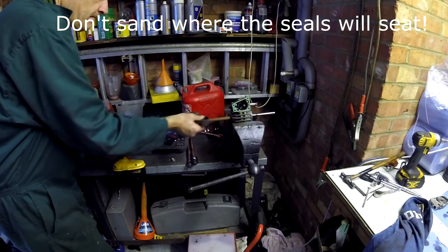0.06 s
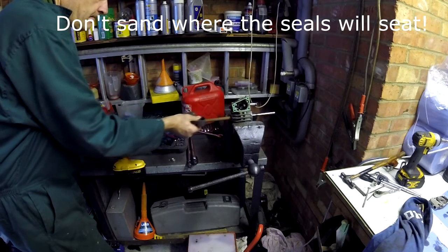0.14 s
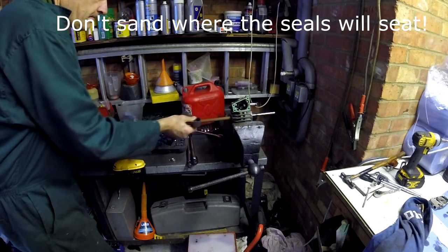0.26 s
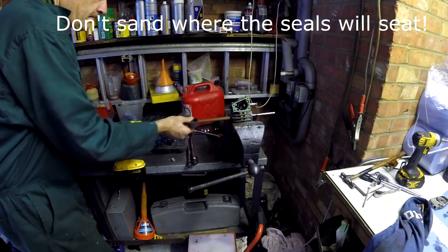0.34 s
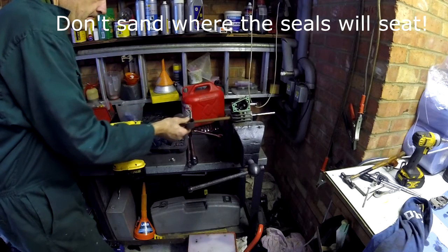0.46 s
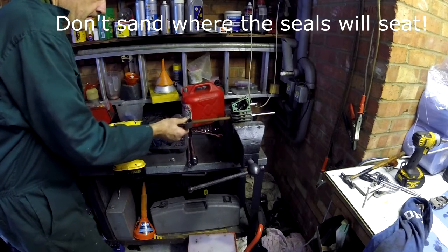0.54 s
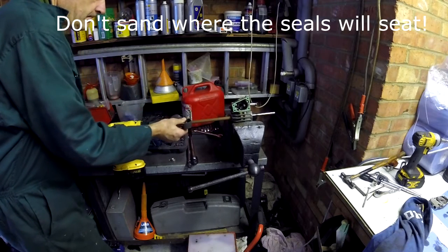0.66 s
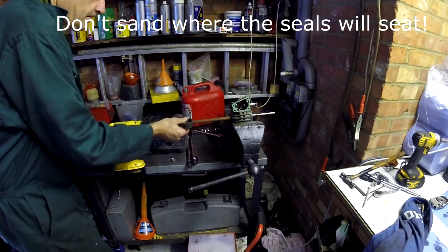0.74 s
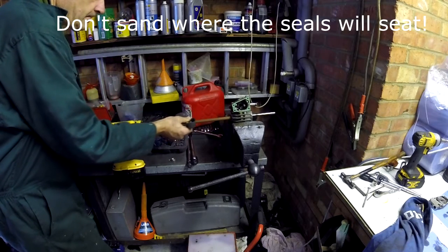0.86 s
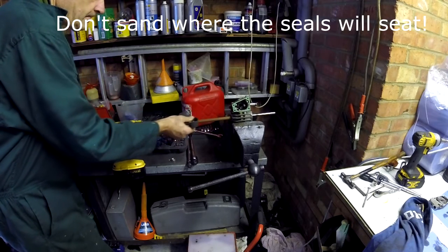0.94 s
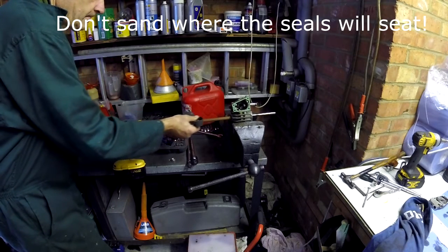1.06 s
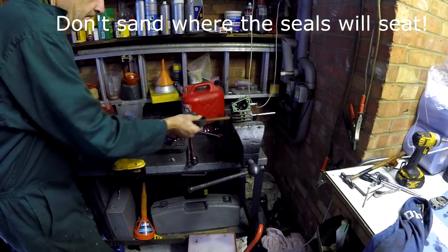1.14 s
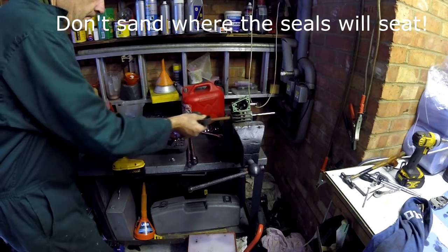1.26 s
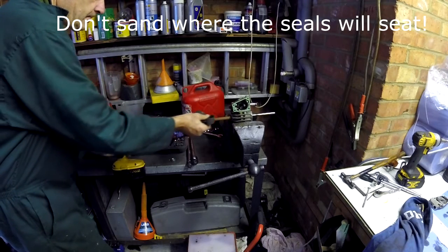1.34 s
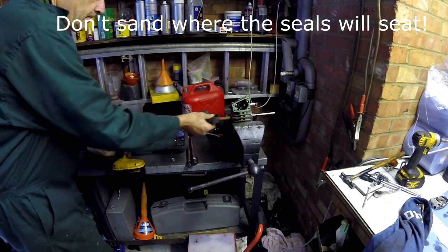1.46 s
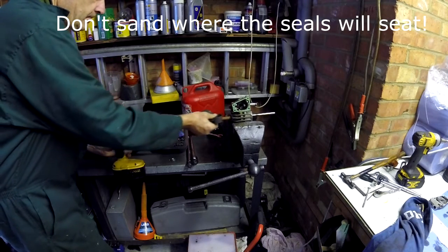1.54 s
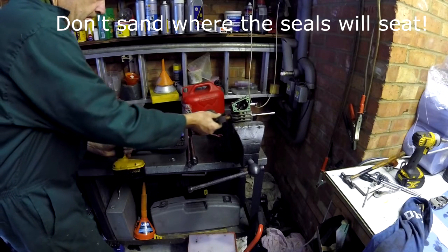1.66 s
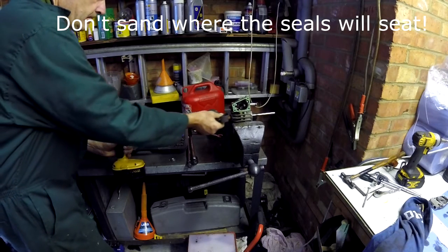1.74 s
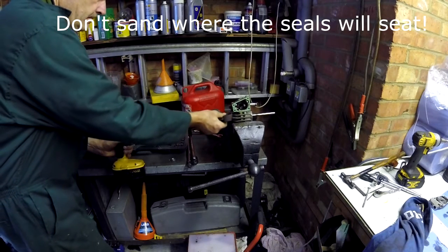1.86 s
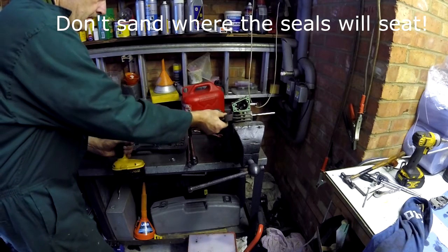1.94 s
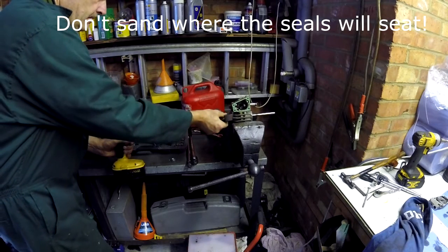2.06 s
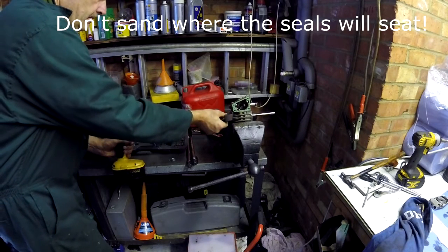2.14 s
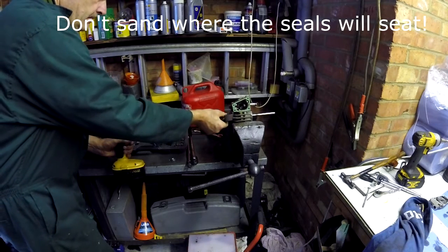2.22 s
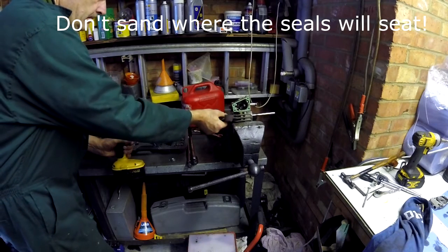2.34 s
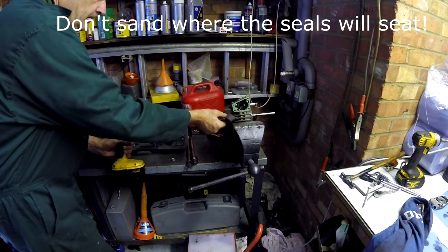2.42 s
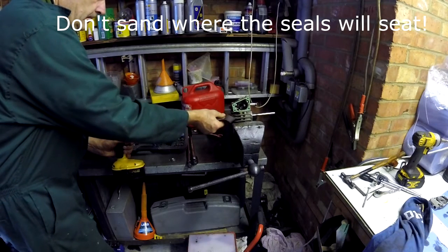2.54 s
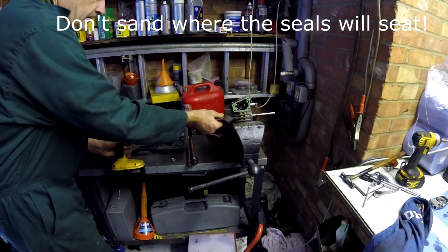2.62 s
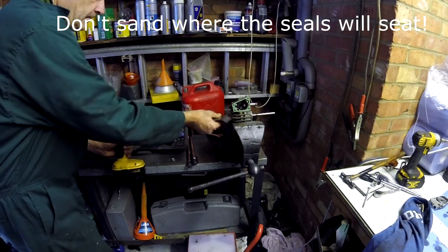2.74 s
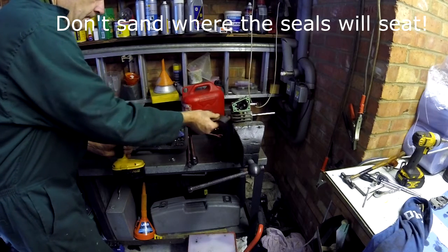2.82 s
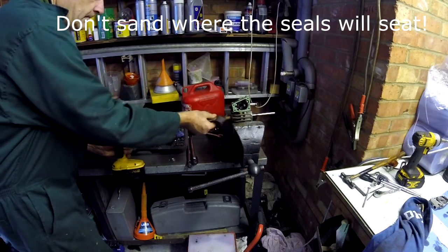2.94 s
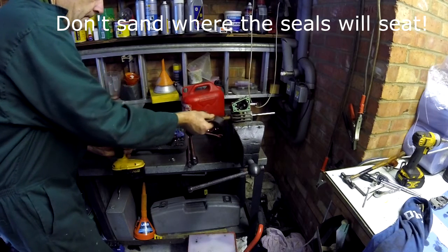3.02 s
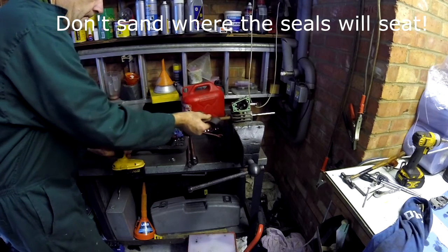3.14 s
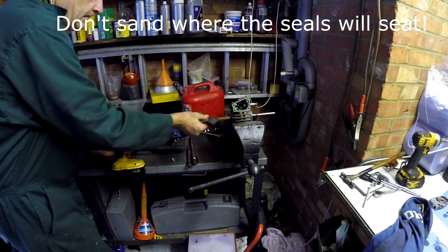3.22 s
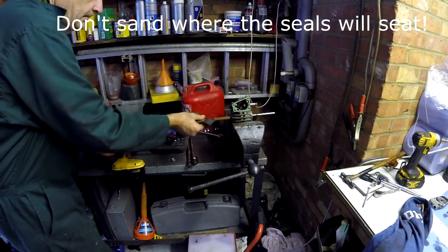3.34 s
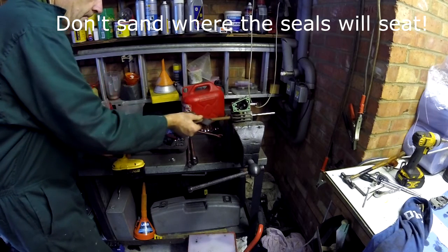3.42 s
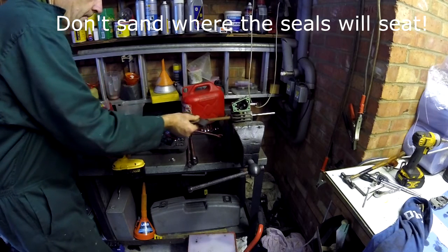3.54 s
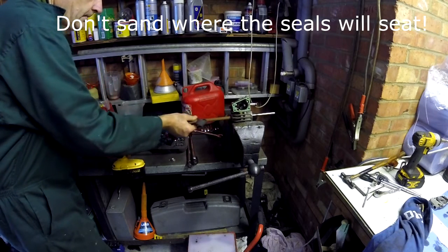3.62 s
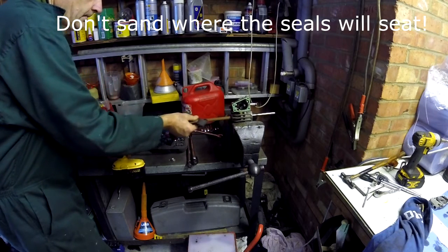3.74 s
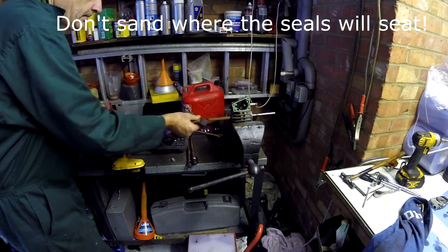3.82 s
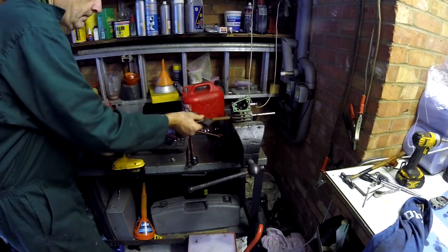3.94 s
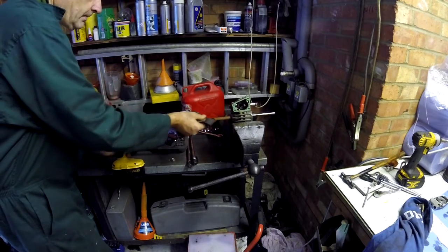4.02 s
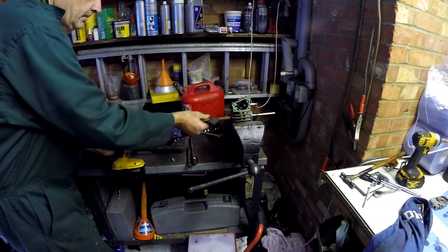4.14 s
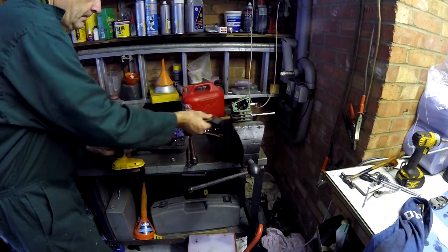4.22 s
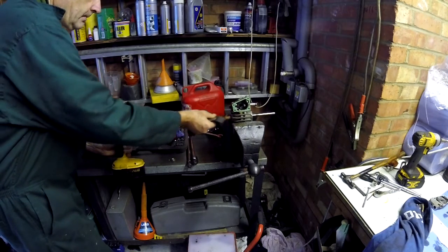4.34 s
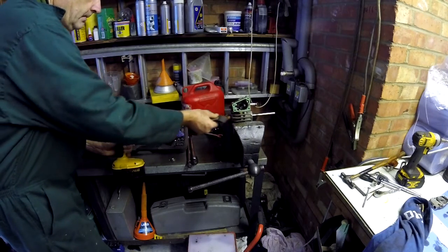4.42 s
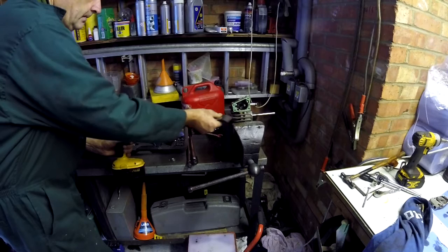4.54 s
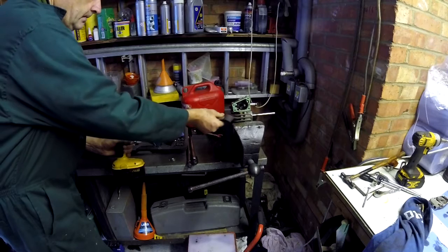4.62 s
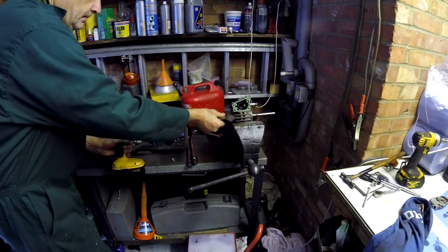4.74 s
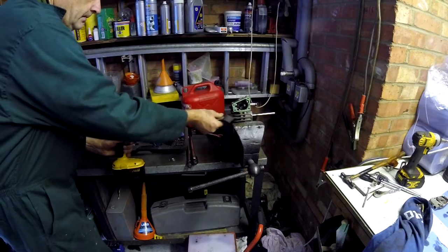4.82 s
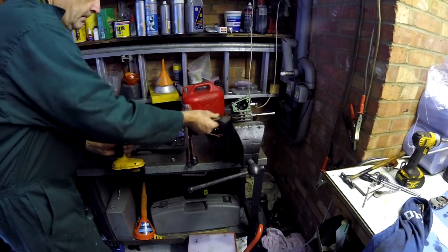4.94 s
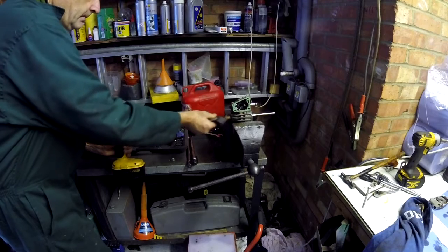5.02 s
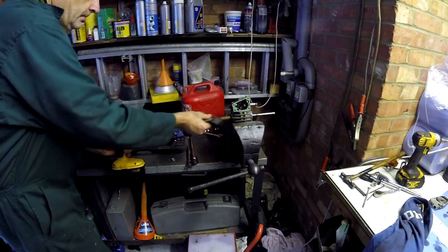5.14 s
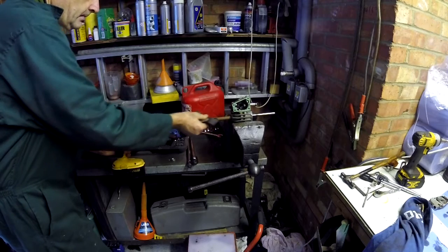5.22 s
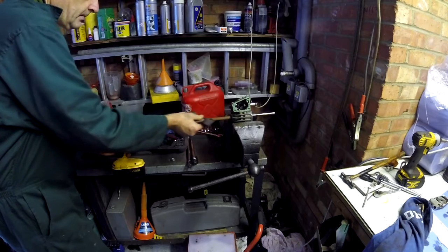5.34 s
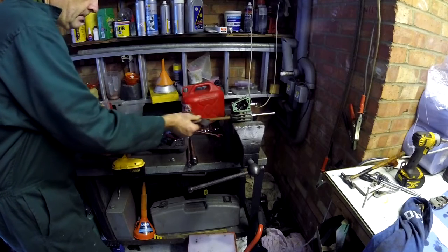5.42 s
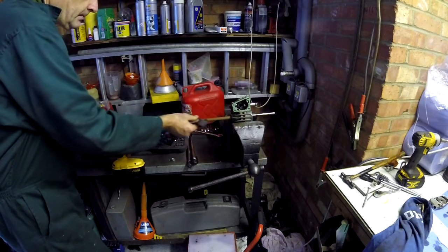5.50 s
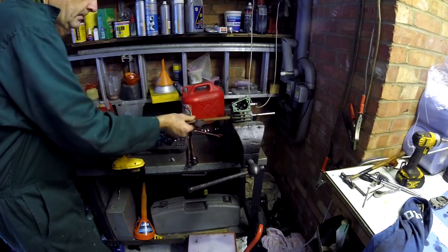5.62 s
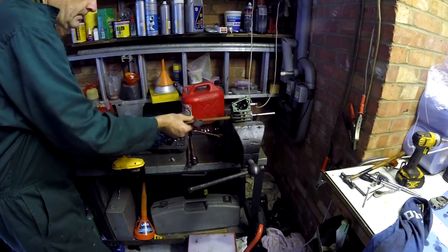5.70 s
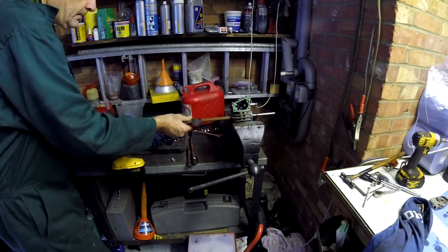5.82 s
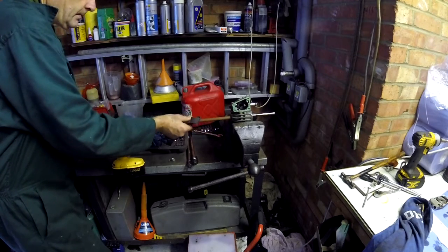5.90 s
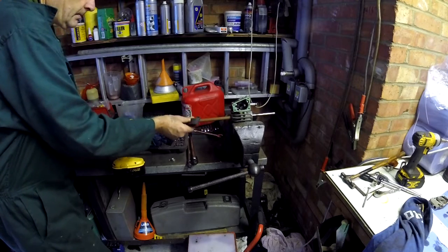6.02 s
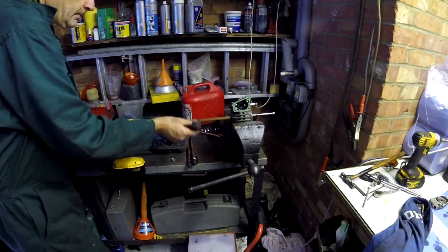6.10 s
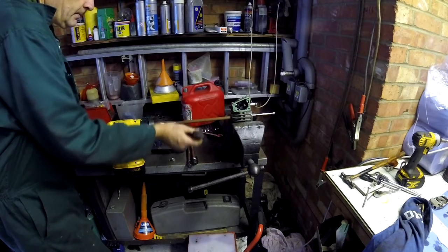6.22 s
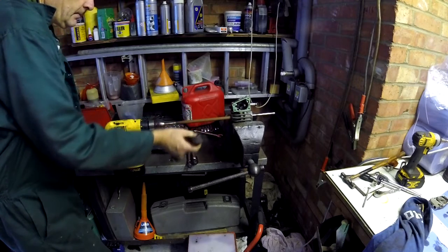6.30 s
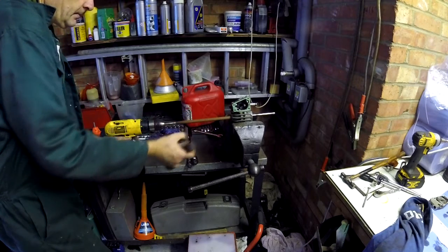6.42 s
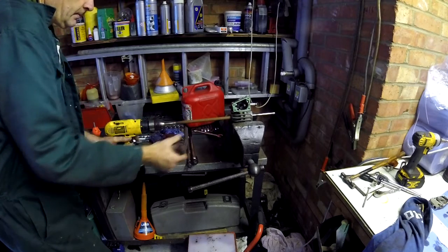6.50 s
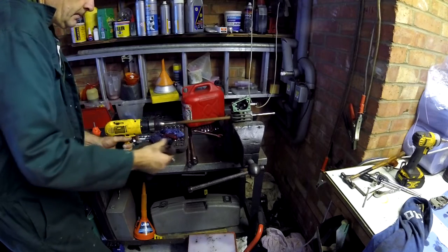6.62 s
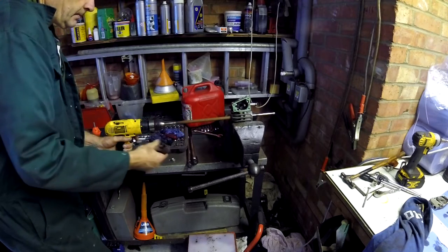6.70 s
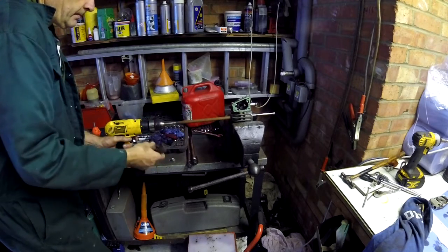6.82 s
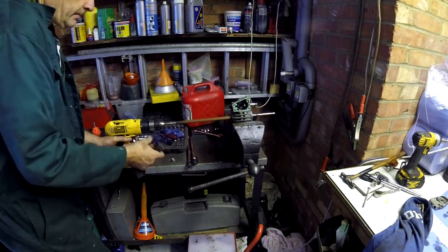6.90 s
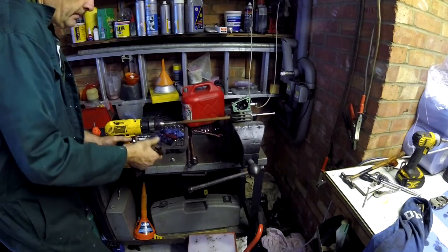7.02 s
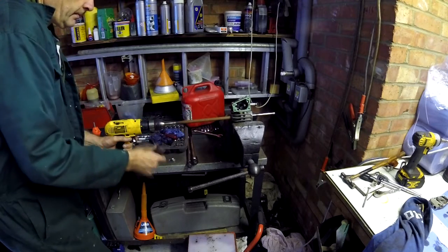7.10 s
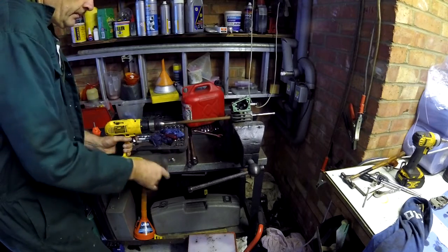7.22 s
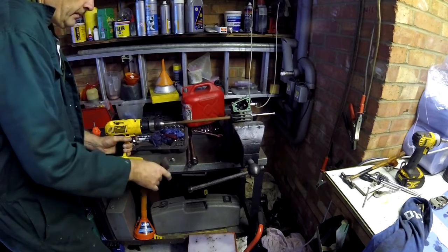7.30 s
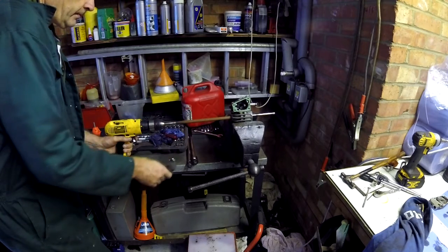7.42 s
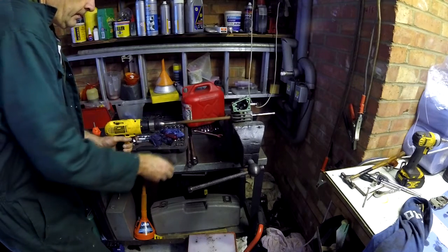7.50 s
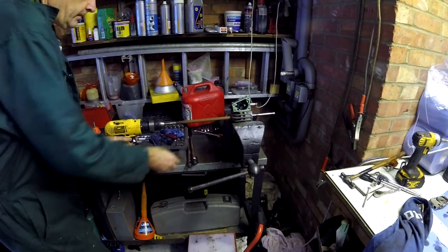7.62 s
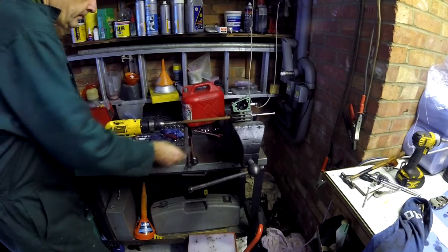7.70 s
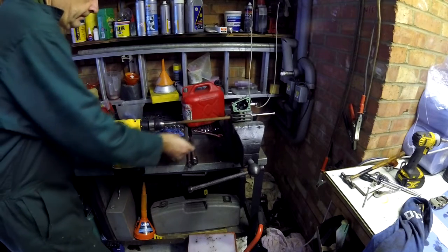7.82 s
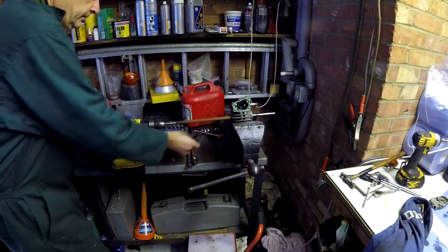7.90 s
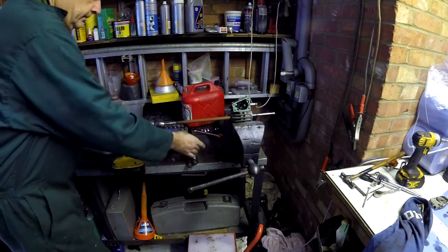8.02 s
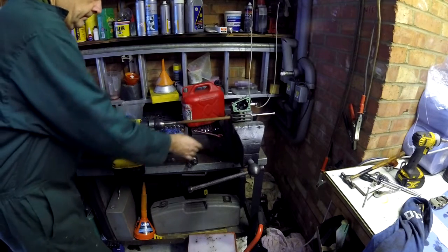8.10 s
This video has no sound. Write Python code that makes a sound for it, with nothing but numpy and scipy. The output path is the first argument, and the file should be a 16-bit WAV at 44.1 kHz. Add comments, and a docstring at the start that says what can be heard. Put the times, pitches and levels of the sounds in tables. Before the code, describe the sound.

A cordless drill spins a rusty steel shaft while sandpaper is pressed against it: a loud, continuous bright gritty hiss with metallic ringing, over a thin gear whine that dips lower under load. Just after six seconds the drill brakes to a sudden halt. In the quiet, stiff paper ticks, snaps and rustles in the hand. Small close-walled workshop, mono camera microphone, thin bass and a sharp treble edge.

```python
"""Drill and sandpaper, small workshop

A cordless drill spins a rusty steel shaft while a hand presses sandpaper on it, close walls around.
Coloured noise is the grit's hiss, filtered noise the ringing shaft; sines on one wavering speed are the gears.
The drill stops and the stiff paper crackles in the hand: ticks, noise bursts and a body resonance.
Behind lie quiet air and low hums. A mono camera microphone cuts the bass and has a sharp treble resonance.
"""
import sys
import numpy as np
from scipy import signal
from scipy.fft import rfft, irfft, next_fast_len
from scipy.io import wavfile
from scipy.ndimage import uniform_filter1d

SR = 44100
rng = np.random.default_rng(int(sys.argv[2]) if len(sys.argv) > 2 else 0)


def wrap_up_sound(samples):
    """Save the sound to the file named by the first command line argument, as 16-bit audio."""
    columns = np.atleast_2d(samples).T
    # keep every value between -1 and 1, then stretch to whole-number steps
    tamed = np.clip(columns, -1, 1)
    steps = np.round(tamed * 32767).astype(np.int16)
    wavfile.write(sys.argv[1], SR, steps)


N = 359402

# workshop air, spectrum: f/Hz, level/dB
AIR_SPECTRUM = [(30, 0), (130, 1.5), (200, -0.5), (350, -7), (700, -12.5), (1500, -16.5), (3000, -27),
                (4200, -49), (5400, -54), (7000, -24), (10000, -25.5), (12000, -33), (15500, -30)]
# low hums whose pitch wavers: f/Hz, rms wander/Hz, level/dB
HUMS = [(146.8, 1.2, -57.5), (166, 2.96, -66)]
AIR_DB = -55.5

# rustle of the handled paper: t/s, level/dB
RUSTLE_LEVEL = [(6.1, -49), (6.18, -66), (6.47, -63), (6.6, -59), (6.72, -64.5), (6.93, -66), (7.06, -60),
                (7.15, -64.5), (7.23, -61.5), (7.3, -66), (7.38, -72), (7.45, -56), (7.53, -69.5),
                (7.9, -71), (8.05, -61), (8.13, -68)]
# snaps of the paper: t/s, level/dB, first tick/dB re snap, burst t60/s, body/dB re snap, body f/Hz,
# bright edge/dB re crackle
PAPER_SNAPS = [(6.2223, -41, 1, .08, -19, 2260, -20), (6.2357, -38, -4, .1, -24, 2060, -19),
               (6.2564, -41, -2, .1, -11, 1650, -16), (6.349, -26, -4, 0.072, -12.5, 1690, -7),
               (6.3694, -31.5, 1, .077, -7, 1670, -17), (6.3844, -41, 2, .08, -18, 2410, -16),
               (6.3984, -39, -2, .08, -11, 2160, -18), (6.5874, -25, -10, .082, -5.5, 2180, -2),
               (6.6094, -41, -2, .16, -11, 2130, -16), (6.781, -38, -2, .1, -6, 1620, -2),
               (6.7945, -19.5, -7, 0.08, -12, 1830, -11), (6.8138, -23.5, 0, .077, -7, 1950, -19),
               (6.8824, -37.5, -9, .1, -9, 1830, -19), (6.9556, -37, -2, .093, -16, 2370, -18),
               (6.972, -29.5, 5, 0.057, -29, 2320, -30), (7.002, -31, -4, 0.16, -16, 1510, -26),
               (7.0344, -36, 0, 0.1, -18, 1850, -21), (7.1387, -44, -3, 0.064, 4, 2090, -16),
               (7.3102, -30, -8, .1, -12, 2030, -25), (7.3731, -41, -2, .1, -5, 1640, -16),
               (7.9189, -36, -8, .061, -5, 1980, -21), (7.958, -40, -1, .1, -10, 1930, -21),
               (7.9714, -40, -2, 0.064, 0, 1890, -20), (8.0165, -29, -4, .12, -14, 1680, -15),
               (8.0332, -21, -3, 0.065, -11, 1500, -20)]
# rubs of the sheet against the fingers: t/s, length/s, f/Hz, resonator width/Hz, level/dB
SHEET_RUBS = [(7.39, .14, 1650, 120, -55), (7.41, 0.12, 2100, 330, -61), (7.42, 0.082, 3100, 300, -63),
              (7.12, .08, 2080, 89, -61), (7.865, .035, 5900, 80, -78)]
# dull knocks of the hand on the shaft: t/s, level/dB
HAND_KNOCKS = [(7.002, -55), (8.0165, -52), (8.033, -41.5)]
# resonances of the sheet: f/Hz, nominal width/Hz, level/dB
SHEET_MODES = [(1680, 760, 1), (2030, 540, 8), (2470, 540, -1), (3200, 740, -3)]
# spectra of the crackle, its bright edge, the first tick of a snap and the knock: f/Hz, level/dB
CRISP_SPECTRUM = [(2500, -27), (3300, 2.5), (4200, -3.5), (6000, -1.5), (7500, -4), (10000, -3),
                  (11500, -20), (15500, -26)]
BRIGHT_SPECTRUM = [(6000, -38), (7200, 1), (9500, 6), (11000, -15.5), (15500, -24)]
TICK_SPECTRUM = [(1200, -14), (2500, 1), (6000, 0), (9000, -1), (11000, -12), (15500, -28)]
THUD_SPECTRUM = [(250, -8), (400, -3), (1100, -1), (1500, -12)]
SHEET_DB = -0.5  # body of the sheet re its rustle
KNOCK_T60_S = 0.09
SMALL_PER_S, SMALL_DB = 23, 16  # tiny scattered ticks: mean rate, level re the rustle

# gears, whose speed sags in steps under load: t/s, mesh f/Hz, mesh level/dB
GEAR_MESH = [(0, 1172, -44), (.5, 1182, -48.5), (1.1, 1175, -43), (2.0, 1173, -40.5), (2.27, 1167, -40.5),
             (2.33, 1140, -52), (2.36, 1058, -51), (3.32, 1041, -50), (3.39, 1040, -60), (3.43, 973, -47),
             (3.62, 962, -45.5), (3.8, 974, -54), (3.88, 990, -61), (3.93, 1163, -43), (4.2, 1162, -39.5),
             (4.75, 1168, -41), (5.1, 1158, -46), (5.5, 1156, -41), (5.76, 1163, -46), (5.9, 1188, -43),
             (6.04, 1112, -54), (6.09, 1020, -76)]
SLOWER_STAGE, FASTER_STAGE = 0.655, 2.523  # multiples of the mesh frequency
SLOWER_DB, FASTER_DB = -49, -2.5  # slower stage; faster tone re the mesh
FREE_HZ, SAG_DB_PER_HZ = 1150, 3  # the upper tones fade when the mesh sags under FREE_HZ
THIRD_DB, THIRD_FADE_DB_PER_S = -1, -3  # third harmonic re the mesh, and its fade with time

# sanding: t/s, hiss level/dB, then middle, upper and high rings/dB re the hiss
SANDING_LEVELS = [(0, -22.5, -8, -10, -10), (.34, -21, -9.5, -10.5, -10.5), (.53, -23, -6, -10, -12.5),
                  (.85, -22, -7.5, -9, -9), (1.4, -22.3, -9, -8.5, -8.5), (1.9, -23.5, -12, -11, -11),
                  (2.15, -22.5, -13.5, -12.5, -13), (2.38, -22, -11.5, -10, -11.5),
                  (3.0, -22, -9, -10.5, -11), (3.7, -24, -8, -8.5, -10), (4.0, -22.5, -10, -11, -10),
                  (4.6, -24, -8.5, -11, -11), (5.1, -23, -9.5, -11, -11), (5.73, -22, -9, -11, -10.5),
                  (5.83, -27.5, -11, -10, -15), (6.04, -29, -10, -12.5, -16), (6.09, -45, -12, -20, -16),
                  (6.14, -57, -10, -12, -11)]
# spectra of the scratching grit and of its fine treble dust: f/Hz, level/dB
GRIT_SPECTRUM = [(100, -27), (400, -7.5), (1000, -4), (2000, -1.5), (3500, -3), (5500, -1.5), (7000, 1),
                 (9500, -0.5), (11000, -11.5)]
DUST_SPECTRUM = [(9000, 3), (11000, -4), (12500, 6.5), (15500, -2)]
# shaft and bench modes damped by the hand, from low to high: f/Hz, nominal width/Hz, level/dB
DEEP_MODES = [(172, 56, -6), (567, 55, -4.5), (280, 39, -9.5), (410, 26, -10), (473, 29, -2.5),
              (709, 16, -2.5), (808, 72, -4), (980, 68, -1.5), (1075, 56, -3)]
LOW_MODES = [(1285, 104, 0.5), (1290, 61, -8), (1447, 100, -1)]
MIDDLE_MODES = [(1539, 61, -2), (1670, 79, -5.5), (1796, 91, 2), (1966, 47, -1), (2065, 44, -1.5),
                (2183, 56, -5.5)]
UPPER_MODES = [(2264, 56, -2.5), (2360, 62, -5), (2528, 64, -1.7), (2655, 78, -1.7), (2803, 54, -2.1)]
HIGH_MODES = [(2944, 134, 2), (3094, 48, -7.5), (3265, 100, -3), (3360, 140, -9), (3560, 52, -4.5),
              (3830, 170, -3.5)]
# spells in which one mode sings out under the moving hand:
# t/s, length/s, f/Hz, resonator width/Hz, level/dB
SINGING_SPELLS = [(.3, 0.4, 1957, 71, -36.5), (.4, 0.32, 2045, 30, -38), (.3, 0.85, 1637, 31, -37.5),
                  (.3, 0.59, 1760, 42, -41), (.3, 0.39, 2750, 70, -39), (1.5, 0.44, 3270, 30, -47),
                  (2.0, 1.137, 3256, 28, -43.5), (2.2, 0.53, 3015, 23, -39), (2.3, 0.29, 2805, 30, -39),
                  (4.4, .7, 3240, 36, -43.5)]
FULL_DB, EASE_MOST_DB = -22.5, 11  # hiss under full pressure; most easing that is counted
# dB re the hiss, and dB gained for each dB that the hiss eases
DEEP_LEVEL, LOW_LEVEL, DUST_LEVEL = (-22, 1), (-18.5, 0.77), (-28, 0.1)

# microphone response: f/Hz, level/dB
MIC_RESPONSE = [(20, -24), (90, -25), (115, -23), (140, -3), (3500, -3.5), (4300, -3), (4800, -2.5),
                (16000, -3.5)]
# microphone port resonances, added to the direct sound: f/Hz, width/Hz, level/dB
PORT_RESONANCES = [(5237, 470, 16.8), (5564, 206, 17.6)]
EDGE_HZ = 15290  # upper band limit


def gain_of(db):
    """Decibels to gain."""
    return 10 ** (np.asarray(db) / 20)


def read(points, hz):
    """Reads a spectrum on a log-frequency axis."""
    f, value = np.transpose(points)
    return np.interp(np.log(hz + 1), np.log(f + 1), value)


def curves(rows):
    """Every column of a timed table, drawn in straight lines at sample rate."""
    s, *columns = np.transpose(rows)
    return [np.interp(np.arange(N) / SR, s, column) for column in columns]


def coloured(x, points):
    """Filters by a spectrum that falls away an octave outside its ends."""
    size = next_fast_len(len(x) + SR // 4)
    closed = [(points[0][0] / 2, -80)] + points + [(points[-1][0] * 2, -80)]
    gain = gain_of(read(closed, np.fft.rfftfreq(size, 1 / SR)))
    return irfft(rfft(x, size) * gain, size)[:len(x)]


def ring(x, hz, width):
    """A resonance of gain 1; one that follows a curve is shifted down to zero, smoothed and shifted back."""
    r = np.exp(-np.pi * width / SR)
    if np.isscalar(hz):
        return 2 * signal.lfilter([1 - r], [1, -r * np.exp(2j * np.pi * hz / SR)], x).real
    turn = np.exp(2j * np.pi * np.cumsum(hz) / SR)
    return 2 * (turn * signal.lfilter([1 - r], [1, -r], x / turn)).real


def microphone(x):
    """The capsule cuts the bass; its port resonates in the treble."""
    x = coloured(x, MIC_RESPONSE)
    return x + sum(gain_of(db) * ring(x, hz, width) for hz, width, db in PORT_RESONANCES)


def evened(x):
    """Scales a sound so that it leaves the microphone at rms 1."""
    return x / np.sqrt(np.mean(microphone(x) ** 2))


def drift(per_s):
    """Random wander of rms 1: noise through a low-pass of corner per_s, drawn every 64 samples."""
    pole = np.exp(-2 * np.pi * per_s * 64 / SR)
    x = signal.lfilter([1], [1, -pole], rng.standard_normal(N // 64 + 2))
    x = uniform_filter1d(x, size=3)
    return np.interp(np.arange(N) / 64, np.arange(len(x)), x / x.std())


def body(x, modes, wander_db, per_s):
    """Steep modes of a solid body that swell and fade each on its own."""
    size = next_fast_len(N)
    hz, spectrum, out = np.fft.rfftfreq(size, 1 / SR), rfft(x, size), 0
    for mode_hz, width, db in modes:
        shape = 1 / (1 + ((hz - mode_hz) / (0.82 * width)) ** 2) / np.sqrt(width)
        mode = irfft(spectrum * shape, size)[:N]
        out = out + gain_of(db + wander_db * drift(per_s)) * mode
    return evened(out)


def narrow(count, hz, width):
    """Noise of rms 1 through two equal resonances in a row."""
    x = rng.standard_normal(count + 2000)
    x = ring(ring(x, hz, width), hz, width)[2000:]  # the build-up is dropped
    return x / x.std()


def spells(rows, edge, pure):
    """Fuzzy tones that swell and fade, each with a thinner core added in the share pure."""
    out = np.zeros(N)
    for s, length, hz, width, db in rows:
        count = round(length * SR)
        tone = pure * narrow(count, hz, width / 4) + narrow(count, hz, width)
        out[round(s * SR):][:count] += gain_of(db) * tone * signal.windows.tukey(count, edge)
    return out


def waver(hz, wander_hz, per_s, wander_db):
    """A tone of rms 1 whose pitch and level wander about their middle."""
    angle = 2 * np.pi * np.cumsum(hz + wander_hz * drift(per_s)) / SR
    return np.sqrt(2) * gain_of(wander_db * drift(per_s)) * np.sin(angle)


def room(x, t60, wet_db):
    """Close walls and shelves answer after 4 ms with a short dense tail of decaying noise."""
    t = np.arange(SR // 2) / SR
    tail = rng.standard_normal(len(t)) * gain_of(-60 * t / t60) * (t > 0.004)
    return x + gain_of(wet_db) * signal.oaconvolve(x, tail / np.linalg.norm(tail))[:N]


def workshop():
    """Quiet air is coloured noise; the low hums are wavering sines."""
    air = evened(coloured(rng.standard_normal(N), AIR_SPECTRUM))
    hums = sum(gain_of(db) * waver(hz, wander_hz, per_s=4.6, wander_db=2.0) for hz, wander_hz, db in HUMS)
    return gain_of(AIR_DB) * air + hums


def paper():
    """Stiff paper rustles in clumps, rubs, and snaps: a sharp tick, then a burst of smaller cracks."""
    rustle_db, = curves(RUSTLE_LEVEL)
    t = np.arange(N) / SR
    cracks = rng.standard_normal(N) * gain_of(2.5 * drift(30.2) + 1.1 * drift(200))
    crisp = evened(coloured(cracks, CRISP_SPECTRUM))
    sheet = body(cracks, SHEET_MODES, wander_db=1.5, per_s=5.7)
    bright = evened(coloured(cracks, BRIGHT_SPECTRUM))
    thud = evened(coloured(cracks, THUD_SPECTRUM))

    held = np.clip((t - RUSTLE_LEVEL[0][0]) / 0.036, 0, 1)
    fits = gain_of(1.5 * drift(12))  # the hand moves in fits
    out = held * gain_of(rustle_db) * (fits * crisp + gain_of(SHEET_DB) * sheet)
    out += spells(SHEET_RUBS, edge=0.85, pure=0.1)

    small = (rng.random(N) < SMALL_PER_S / SR) * rng.standard_normal(N)
    ticks = held * small * gain_of(rustle_db + SMALL_DB)
    u = t[:SR // 10]  # time since the snap or knock
    for s, db, tick_db, t60, body_db, hz, bright_db in PAPER_SNAPS:
        at = slice(round(s * SR), round(s * SR) + len(u))
        ticks[at.start] = gain_of(db + tick_db) * rng.choice([-1, 1])
        decay = gain_of(-18 - 60 * u / t60) + gain_of(-8.0 - 60 * u / 0.011)
        burst = decay * (1 - np.exp(-u / 0.0004))
        swell = gain_of(-7.0 - 60 * u / t60) * (1 - np.exp(-u / 0.0027))  # the body answers more slowly
        cracking = crisp[at] + gain_of(bright_db) * bright[at]
        # the first 20 ms are brought to one strength, so that each snap keeps its own level
        cracking = cracking / cracking[:SR // 50].std() * crisp.std()
        bend = 0.49 * sheet[at] + 0.65 * narrow(len(u), hz, width=200)  # the bent sheet favours one pitch
        out[at] += gain_of(db) * (burst * cracking + swell * gain_of(body_db) * bend)

    for s, db in HAND_KNOCKS:
        at = slice(round(s * SR), round(s * SR) + len(u))
        knock = thud[at] / thud[at][:SR // 40].std() * thud.std()
        out[at] += gain_of(db - 60 * u / KNOCK_T60_S) * (1 - np.exp(-u / 0.0018)) * knock

    click = coloured(signal.unit_impulse(4096, "mid"), TICK_SPECTRUM)
    click = click / abs(microphone(click)).max()  # peak 1 at the microphone
    return out + signal.oaconvolve(ticks, click, "same")


def running():
    """1 while the motor turns, falling to 0 in 20 ms as the brake stops it."""
    return np.clip((GEAR_MESH[-1][0] - np.arange(N) / SR) / 0.02, 0, 1)


def whine():
    """The tooth mesh trembles a little; the slower gear stage is a fuzzy band on the same speed."""
    hz, mesh_db = curves(GEAR_MESH)
    angle = 2 * np.pi * np.cumsum(hz + 2.6 * drift(23) + 4.0 * drift(1.5)) / SR
    sag_hz = np.maximum(FREE_HZ - hz, 0)
    upper_db = mesh_db - SAG_DB_PER_HZ * sag_hz
    third_db = upper_db + THIRD_DB + THIRD_FADE_DB_PER_S * np.arange(N) / SR
    tones = gain_of(mesh_db) * np.sin(angle)
    tones += gain_of(third_db) * np.sin(3 * angle)
    tones += gain_of(upper_db + FASTER_DB) * np.sin(FASTER_STAGE * angle)
    tones *= np.sqrt(2) * gain_of(2.1 * drift(7.2))

    slower = rng.standard_normal(N)
    for _ in range(2):
        slower = ring(slower, SLOWER_STAGE * hz, width=23)
    slower *= gain_of(SLOWER_DB) / slower.std()
    # the housing hums along
    shell = gain_of(-52.0) * waver(468, wander_hz=4.4, per_s=12.0, wander_db=2.0)
    return shell + tones + slower


def sanding():
    """Countless grains scratch the rust and ring the shaft; pits and wobble make the contact flutter."""
    hiss_db, middle_db, upper_db, high_db = curves(SANDING_LEVELS)
    ease_db = np.minimum(FULL_DB - hiss_db, EASE_MOST_DB)
    deep_db, low_db, dust_db = (db + share * ease_db for db, share in (DEEP_LEVEL, LOW_LEVEL, DUST_LEVEL))
    flutter = gain_of(0.5 * drift(19) + 0.12 * drift(106) + 0.5 * drift(1.7))

    grit = rng.standard_normal(N) * flutter
    dust_db = dust_db + 0.96 * drift(4.4)
    sound = evened(coloured(grit, GRIT_SPECTRUM))
    sound += gain_of(dust_db) * evened(coloured(grit, DUST_SPECTRUM))

    groups = (DEEP_MODES, LOW_MODES, MIDDLE_MODES, UPPER_MODES, HIGH_MODES)
    for modes, db in zip(groups, (deep_db, low_db, middle_db, upper_db, high_db)):
        db = db + 0.86 * drift(2.1)  # each group of rings swells on its own
        scratches = rng.standard_normal(N) * flutter
        # the modes swell and fade as the grip shifts
        sound += gain_of(db) * body(scratches, modes, wander_db=0.5, per_s=0.46)
    turning = np.clip((SANDING_LEVELS[-1][0] - np.arange(N) / SR) / 0.025, 0, 1)
    return sound * gain_of(hiss_db) * turning + spells(SINGING_SPELLS, edge=0.65, pure=0.82)


def scene():
    """One microphone feeds both channels; the walls answer the rasp and the paper."""
    mono = workshop()
    mono += room(paper(), t60=0.18, wet_db=-9.5)
    mono += whine() * running()
    mono += room(sanding(), t60=0.12, wet_db=-15.0)
    return np.array([mono, mono])


def record(dry):
    """Microphone colour, then a steep low-pass as band limit."""
    heard = np.tile(microphone(dry.mean(axis=0)), (2, 1))
    low_pass = signal.firwin(2047, EDGE_HZ, window=("kaiser", 10), fs=SR)
    return signal.oaconvolve(heard, low_pass[None], "same")


dry = scene()
out = record(dry)
wrap_up_sound(out)
```